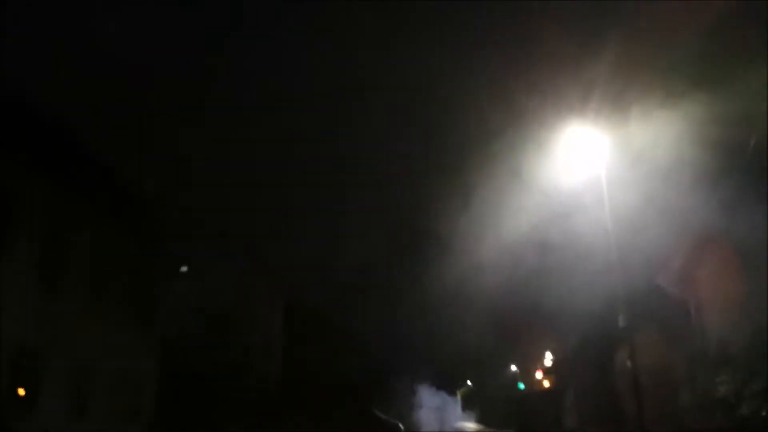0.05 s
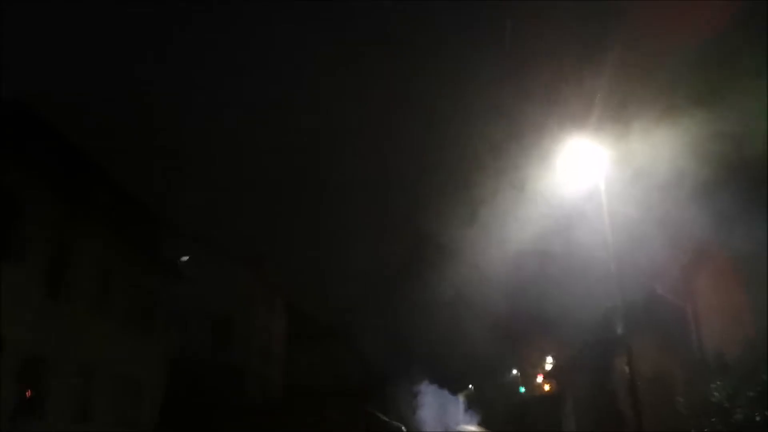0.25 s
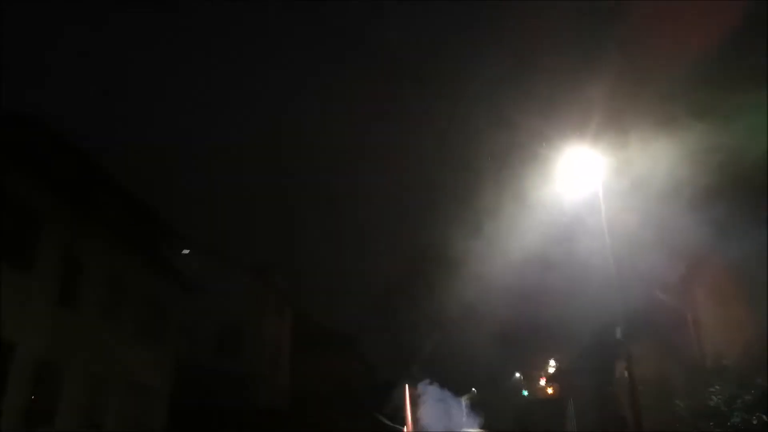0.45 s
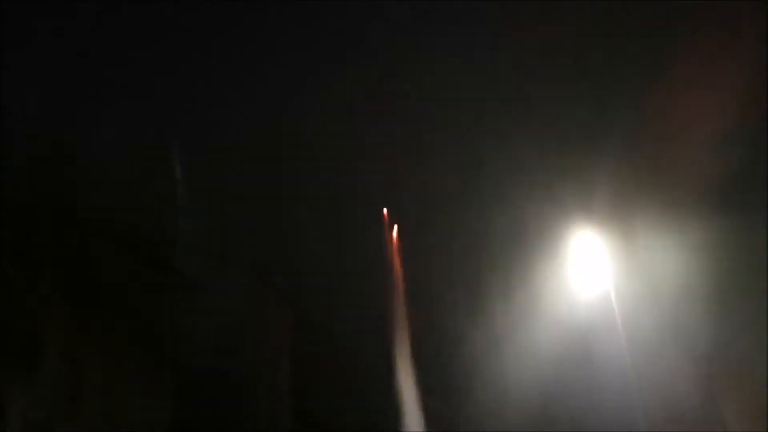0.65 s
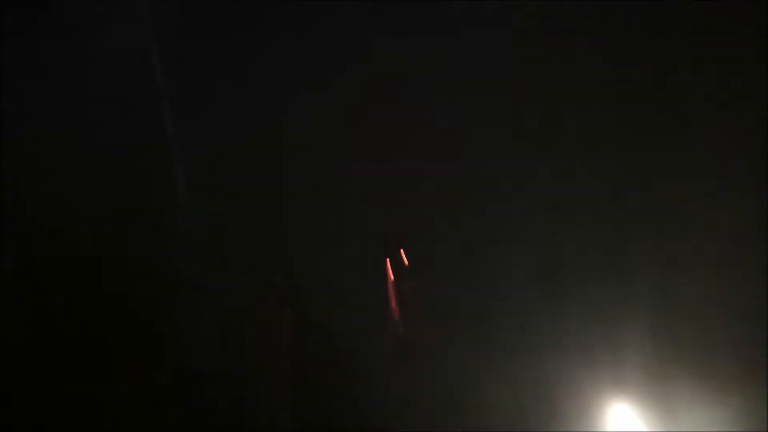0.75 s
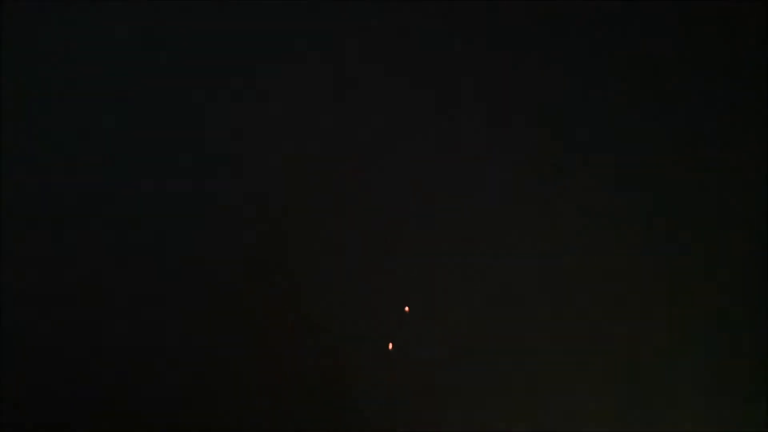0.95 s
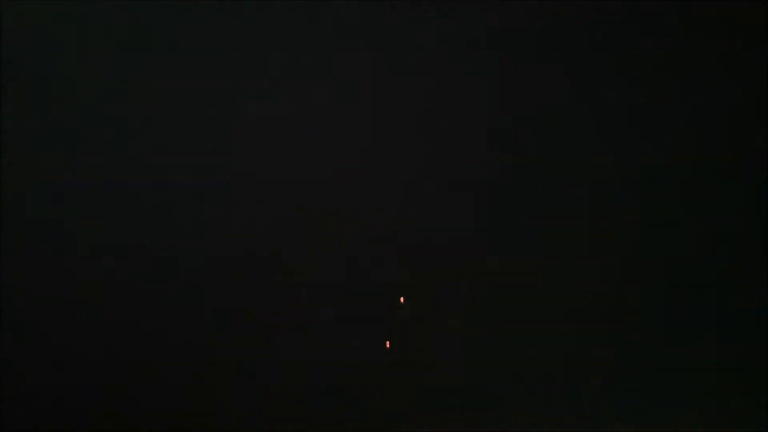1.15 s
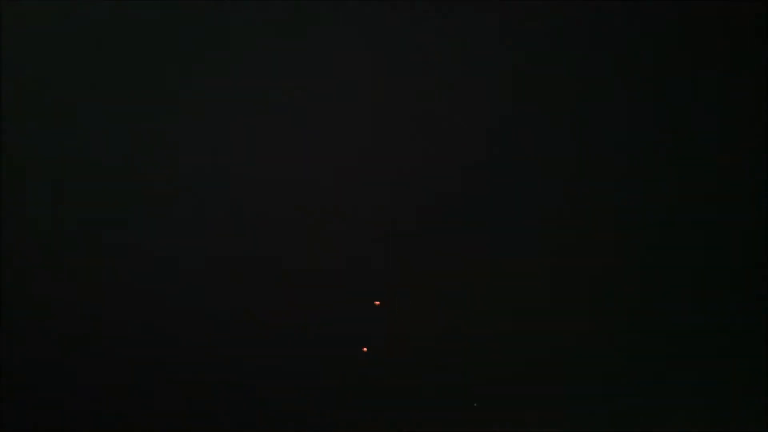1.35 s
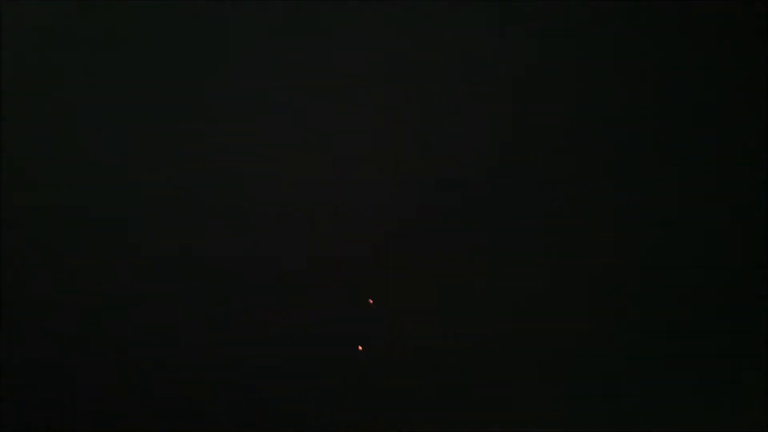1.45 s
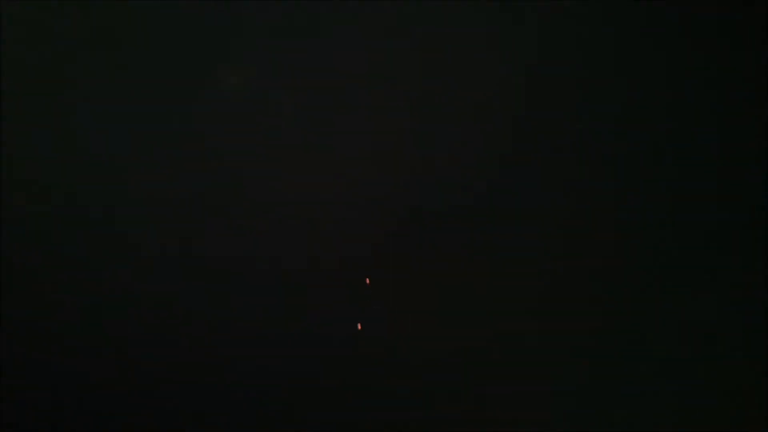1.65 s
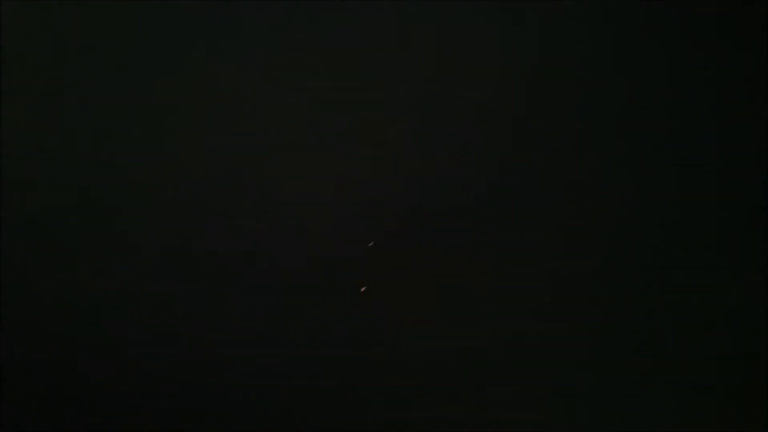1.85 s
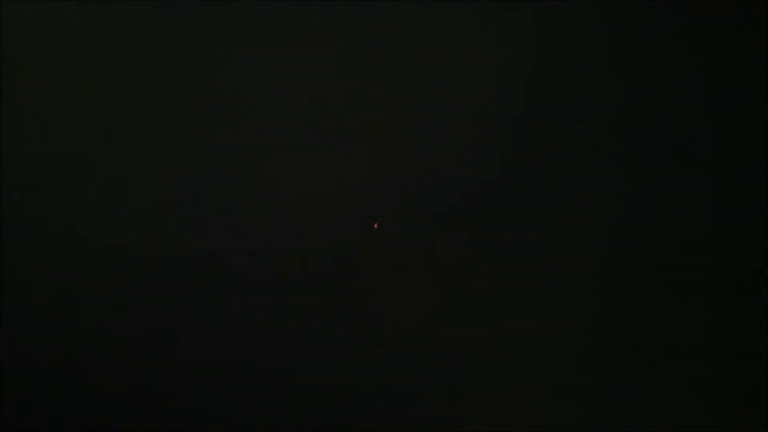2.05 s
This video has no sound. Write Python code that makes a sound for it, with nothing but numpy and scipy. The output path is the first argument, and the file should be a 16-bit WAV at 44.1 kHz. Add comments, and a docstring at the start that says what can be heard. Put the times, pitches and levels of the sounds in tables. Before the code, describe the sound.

After a dull handling bump, a firework rocket whistles briefly and bursts into a bright, sputtering rush, reflected by house fronts, then dwindles to faint hiss and sparse ticks; outdoors, close hand-held microphone.

```python
"""A brief, fraying whistle gives way to a loud whoosh as a firework rocket lights in a street and climbs away.
The jet is shaped noise that fades, dulls and sputters; its motor casing rings on one gliding pitch.
The burning charge spits pops and fine crackle, and house fronts return part of the sound.
The two-port hand-held microphone is rubbed once near the start and catches wind: low-passed slips and low noise."""
import sys
import numpy as np
from scipy import signal
from scipy.fft import rfft, irfft
from scipy.io import wavfile
from scipy.ndimage import map_coordinates

SR = 44100
rng = np.random.default_rng(int(sys.argv[2]) if len(sys.argv) > 2 else 0)


def digitize_waveform(pressure):
    """Quantize a signal to 16-bit integers and store it at the path in sys.argv[1].

    Rows of a 2-D input are taken as channels; values are limited to [-1, 1].
    """
    field = np.atleast_2d(pressure).T
    bounded = np.clip(field, -1, 1)
    quanta = np.round(bounded * 32767).astype(np.int16)
    wavfile.write(sys.argv[1], SR, quanta)


N = 92610
T = np.arange(N) / SR  # time of each sample, s


def from_db(db):
    """Decibels to amplitude gain."""
    return 10 ** (np.asarray(db) / 20)


def in_time(rows):
    """The columns of a time table, interpolated at every sample."""
    time_s, *columns = np.transpose(rows)
    return [np.interp(T, time_s, column) for column in columns]


def at_hz(rows, hz):
    """The columns of a frequency table, interpolated on a log scale at the given frequencies."""
    table_hz, *columns = np.transpose(rows)
    return np.array([np.interp(np.log(hz + 1), np.log(table_hz), column) for column in columns])


def bin_hz():
    """Frequencies of the spectrum of a sound padded to twice its length."""
    return np.arange(N + 1) * SR / (2 * N)


def filtered(x, gain):
    """Give each frequency its gain."""
    spectrum = rfft(x, 2 * N) * gain
    return irfft(spectrum)[..., :N]


def coloured(x, colour):
    """Shape a sound by a table of frequency and level."""
    return filtered(x, from_db(at_hz(colour, bin_hz())))


def wobble(hz):
    """Random motion mostly below the given rate, with a spread of 1."""
    motion = filtered(rng.standard_normal(N), 1 / np.sqrt(1 + (bin_hz() / hz) ** 6))
    return motion / motion.std()


# The jet's changing loudness before its colour: (start_s, hiss_level_db, rush_level_db, roar_level_db)
JET_LEVELS = [(0.0, -65.5, -68.5, -56.5), (0.1, -68.5, -62.5, -56), (0.3, -40.5, -44.5, -54),
              (0.33, -36, -42, -46), (0.35, -31.5, -36, -34.5), (0.37, -27, -32, -37),
              (0.39, -30, -34, -37.5), (0.44, -24, -33.5, -33), (0.5, -30, -35.5, -39),
              (0.53, -25.5, -28.5, -31.5), (0.55, -27, -27.5, -35.5), (0.6, -25, -29, -30.5),
              (0.62, -28, -32.5, -32.5), (0.64, -26.5, -27, -28.5), (0.67, -28, -29.5, -34),
              (0.69, -27.5, -25, -27.5), (0.71, -31.5, -31, -29), (0.72, -32, -29.5, -34.5),
              (0.79, -40, -42, -38.5), (0.81, -41.5, -38.5, -44), (0.94, -50.5, -43.5, -47.5),
              (1.37, -62, -58, -53.5), (1.55, -66, -58.5, -56), (2.04, -79.5, -67.5, -66.5),
              (2.1, -80, -68, -64)]
# Fixed colour of the jet: (frequency_hz, gain_db)
JET_COLOUR = [(40, -15.5), (130, 5), (300, 6), (500, 4), (800, 12.5), (1050, 18), (1500, 17.5),
              (2300, 16.5), (3000, 15.5), (4300, 15.5), (7500, 17), (11000, 15.5), (15500, 10.5)]
ROAR_HZ, RUSH_HZ, HISS_HZ = 1100, 2830, 10000  # where the three levels hold; between them they blend
SPUTTER_DB, SPUTTER_HZ = -0.24, 160  # uneven burning: spread and top rate
SURGE_DB, SURGE_HZ = .5, 22


def jet():
    """Turbulent exhaust: noise whose hiss leads at ignition; the roar outlasts it and the burn sputters."""
    noise = rng.standard_normal((3, N))
    hz, frame_s, spectrum = signal.stft(noise, SR, nperseg=512)
    levels_db = np.array([np.interp(frame_s, T, db) for db in in_time(JET_LEVELS)])
    # share of hiss, rush and roar at each frequency
    blend = at_hz([(ROAR_HZ, 0, 0, 1), (RUSH_HZ, 0, 1, 0), (HISS_HZ, 1, 0, 0)], hz).T
    colour_db = at_hz(JET_COLOUR, hz).T
    flow = signal.istft(spectrum * from_db(colour_db + blend @ levels_db), SR)[1][:, :N]
    return flow * from_db(SPUTTER_DB * wobble(SPUTTER_HZ) + SURGE_DB * wobble(SURGE_HZ))


# Breathy ringing of the motor casing, its level before the modes: (start_s, pitch_hz, level_db)
CASING_GLIDE = [(0, 1776, -69), (.11, 1805, -56), (.17, 1830, -52), (.2, 1838, -43), (.25, 1900, -34),
                (.32, 1947, -30), (.38, 1950, -22.5), (.49, 1950, -31.5), (.58, 1887, -26.5),
                (.7, 1868, -30.5), (.8, 1890, -48), (1.1, 1815, -50.5), (1.55, 1810, -54.5),
                (2.1, 1805, -69.5)]
# Resonances of the casing: (multiple of the pitch, width_hz, level_db)
CASING_MODES = [(1, 424, -2.5), (1.98, 490, -6.5), (2.87, 670, -1.5), (3.94, 700, -4.5)]


def casing():
    """The gas blows the casing like a pipe: broad, breathy resonances on one gliding pitch."""
    pitch_hz, level_db = in_time(CASING_GLIDE)
    phase = 2 * np.pi * np.cumsum(pitch_hz) / SR
    ringing = np.zeros((3, N))
    for multiple, width_hz, mode_db in CASING_MODES:
        for path in ringing:
            # two random swings a quarter turn apart make a band of noise around the pitch
            in_step = wobble(width_hz / 2) * np.cos(multiple * phase)
            quarter_off = wobble(width_hz / 2) * np.sin(multiple * phase)
            path += from_db(mode_db) * (in_step + quarter_off)
    return ringing * from_db(level_db)


WHISTLE_S, WHISTLE_ATTACK_S, WHISTLE_HOLD_S, WHISTLE_RELEASE_S = 0.1, 0.057, 0.12, 0.094
WHISTLE_DB, WHISTLE_SWELL_DB_PER_S = -35, 30  # level at its start, and rise
WHISTLE_JITTER_HZ_PER_S, WHISTLE_JITTER_HZ = 458, 155  # growth of the pitch unsteadiness, and its top rate
WHISTLE_FLUTTER_DB, WHISTLE_FLUTTER_HZ = 5, 110  # spread and top rate of the level flutter


def whistle():
    """At low thrust the lowest resonance locks into a tone that swells, frays in pitch and dies out."""
    pitch_hz, _ = in_time(CASING_GLIDE)
    age_s = np.clip(T - WHISTLE_S, 0, 1)
    edges_s = WHISTLE_S + np.cumsum([0, WHISTLE_ATTACK_S, WHISTLE_HOLD_S, WHISTLE_RELEASE_S])
    envelope = np.interp(T, edges_s, [0, 1, 1, 0]) ** 2
    paths = []
    for _ in range(3):
        unsteady_hz = pitch_hz + WHISTLE_JITTER_HZ_PER_S * age_s * wobble(WHISTLE_JITTER_HZ)
        paths.append(np.sin(2 * np.pi * np.cumsum(unsteady_hz) / SR))
    flutter_db = WHISTLE_FLUTTER_DB * wobble(WHISTLE_FLUTTER_HZ)
    level_db = WHISTLE_DB + WHISTLE_SWELL_DB_PER_S * age_s + flutter_db
    return from_db(level_db) * envelope * np.array(paths)


# Pops of the burning fuse and charge, relative to one another: (start_s, level_db)
POPS = [(.047, -37), (1.051, -18), (1.177, -36), (1.234, -21.5), (1.410, -34), (1.433, -40), (1.505, -25),
        (1.584, -27), (1.642, -28.5), (1.651, -37), (1.692, -29), (1.703, -28), (1.739, -36), (1.751, -32)]
# Colour of the pops and the crackle: (frequency_hz, gain_db)
POP_COLOUR = [(300, -30), (900, -12), (1700, 7), (3000, -4), (5600, -3.5), (8000, -9.5), (14000, -20)]
POP_DECAY_S, POP_DB = .003, -5.5  # fall to 1/e; level added to all pops


def pops():
    """Short sharp spits of the charge: noise bursts that start at once and decay exponentially."""
    envelope = np.zeros(N)
    for start_s, level_db in POPS:
        decay = (T >= start_s) * np.exp(-np.abs(T - start_s) / POP_DECAY_S)
        envelope += from_db(level_db + POP_DB) * decay
    return coloured(envelope * rng.standard_normal((3, N)), POP_COLOUR)


CRACKLE_PER_S, CRACKLE_DB, CRACKLE_SPREAD_DB = 260, 6.5, 9.5  # rate, level against the roar, size spread


def crackle():
    """Tiny cracks at random times and of random size, which ride on the roar."""
    *_, roar_db = in_time(JET_LEVELS)
    size_db = CRACKLE_SPREAD_DB * np.minimum(rng.exponential(1, (3, N)), 3)
    sizes = from_db(size_db) * rng.choice([-1, 1], (3, N))
    clicks = sizes * (rng.random((3, N)) < CRACKLE_PER_S / SR)
    return coloured(clicks / clicks.std() * from_db(roar_db + CRACKLE_DB), POP_COLOUR)


# Direction of the rocket, heard as delay at the left port: (start_s, lag_ms)
PORT_LAG = [(0, 0.015), (.4, 0.041), (.65, .022), (.9, 0.0059), (2.1, .002)]
# Power share of direct sound, the rest coming back from the house fronts: (frequency_hz, share 0-1)
DIRECT_SHARE = [(100, 0.8), (400, 0.27), (650, 0.07), (1200, 0.76), (1800, 0.71), (2800, 0.16),
                (5300, 0.47), (8000, 0.47), (11000, 0), (15000, .15)]


def in_street(three):
    """Of three like sounds, one comes straight, later at the left port; the others scatter, one a side."""
    direct, scattered = three[0], three[1:]
    lag_ms, = in_time(PORT_LAG)
    fine = signal.resample_poly(direct, 2, 1)  # twice the sample rate, for smooth reading between samples
    left = map_coordinates(fine, [2 * SR * (T - lag_ms / 1000)], order=3)
    share = np.clip(at_hz(DIRECT_SHARE, bin_hz()), 0, 1)
    straight = filtered(np.array([left, direct]), np.sqrt(share))
    return straight + filtered(scattered, np.sqrt(1 - share))


# Wind on the microphone, levels before colour: (start_s, rumble_level_db, buffeting_level_db)
WIND_LEVELS = [(0.0, -41, -54), (0.03, -43, -38.5), (0.06, -29, -41.5), (0.1, -48, -50.5), (0.13, -39, -60),
               (0.18, -33, -59), (0.21, -46, -65), (0.24, -34.5, -49), (0.32, -54, -67), (0.41, -64, -55.5),
               (0.44, -47, -60), (0.56, -71, -54.5), (0.61, -44.5, -43.5), (0.77, -67, -49),
               (0.81, -38, -53.5), (0.88, -37.5, -41.5), (0.97, -54, -53.5), (1.04, -44.5, -46),
               (1.08, -52.5, -59), (1.23, -51.5, -53), (1.49, -61, -65), (1.77, -55.5, -65),
               (1.95, -62.5, -69), (2.1, -60, -64.5)]
# Colour of the deep rumble: (frequency_hz, gain_db)
RUMBLE_COLOUR = [(12, 5), (25, 31.5), (45, 24.5), (70, 21), (110, 1), (250, -8), (1000, -73)]
# Colour of the buffeting: (frequency_hz, gain_db)
BUFFET_COLOUR = [(30, -2), (70, 24.5), (110, 25), (200, 17), (350, 5.5), (700, -12), (2000, -64)]
WIND_APART_DB = -16  # part that is opposite at the two ports, against the common part


def wind():
    """Air pressing on the microphone: deep rumble and lighter buffeting, nearly the same at both ports."""
    both = np.zeros((2, N))
    for level_db, colour in zip(in_time(WIND_LEVELS), (RUMBLE_COLOUR, BUFFET_COLOUR)):
        common = rng.standard_normal(N)
        apart = from_db(WIND_APART_DB) * rng.standard_normal(N) * np.array([[1], [-1]])
        both += coloured(common + apart, colour) * from_db(level_db)
    return both


RUB_S, RUB_LENGTH_S, RUB_SLIPS_PER_S = .026, 0.021, 170
RUB_DB, RUB_TOP_HZ = 6, 350  # size of each slip before the filters; low-pass corner


def rub():
    """A finger slips a few times on the microphone's housing: dull thuds at slightly uneven spacing."""
    slip_s = RUB_S + (np.arange(12) + rng.normal(0, .1, 12)) / RUB_SLIPS_PER_S
    slips = np.zeros(N)
    # slips past the end of the rub are silent
    slips[np.abs(slip_s * SR).astype(int)] = from_db(RUB_DB) * (slip_s < RUB_S + RUB_LENGTH_S)
    dull = signal.sosfilt(signal.butter(4, RUB_TOP_HZ, fs=SR, output="sos"), slips)
    return signal.sosfilt(signal.butter(1, 60, "high", fs=SR, output="sos"), dull)


WHISTLE_PAN_DB = -2.5  # left against right


def scene():
    """The rocket in the street, with wind and handling at the microphone."""
    pan = from_db(WHISTLE_PAN_DB * np.array([[.5], [-.5]]))
    rocket = in_street(jet() + casing() + pops() + crackle())
    return rocket + pan * in_street(whistle()) + wind() + rub()


# Response of the two microphone ports: (frequency_hz, left_gain_db, right_gain_db)
PORT_RESPONSE = [(202.56, 0, -0.5), (553, -3, 0.5), (1087, -5.5, 0), (1900, 1.5, 3.5), (2700, 1, 0.5),
                 (4300, 1.5, 0.5), (4900, -4, 4.5), (5720, 4.5, 5), (6360, 3.5, -3.5), (7100, 5.5, -2.5),
                 (7860, 9, -0.5), (8700, -1, 1.5), (9970, -11, -4), (15100, -12.5, -3.5)]
# Phase lead of the left port over the right: (frequency_hz, lead_rad)
PORT_LEAD = [(600, 0), (1800, .2), (2600, -.3), (4300, -.7), (4900, -.9), (5500, -.2), (6400, -.3),
             (7800, -2), (8700, -2.7), (15000, -3.5)]
PEAK_TOP, CUTOFF_HZ = .88, 15200  # ceiling of the rounding (full scale 1); steep top cut


def record(dry):
    """Each port colours the sound, the left shifted in phase; high peaks are rounded, the top cut steeply."""
    left_db, right_db = at_hz(PORT_RESPONSE, bin_hz())
    lead_rad, = at_hz(PORT_LEAD, bin_hz())
    left_gain = from_db(left_db) * np.exp(1j * lead_rad)
    heard = filtered(dry, np.array([left_gain, from_db(right_db)]))
    rounded = heard / (1 + (heard / PEAK_TOP) ** 6) ** (1 / 6)
    return filtered(rounded, 1 / np.sqrt(1 + (bin_hz() / CUTOFF_HZ) ** 400))


dry = scene()
out = record(dry)
digitize_waveform(out)
```